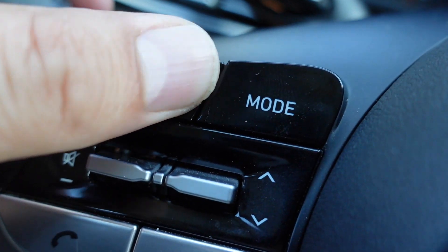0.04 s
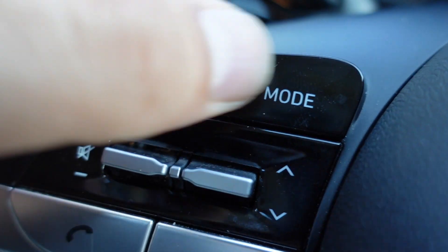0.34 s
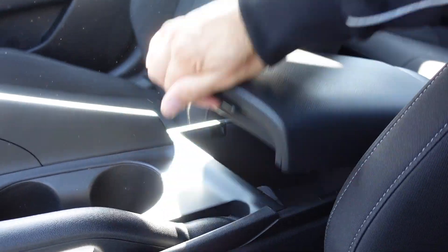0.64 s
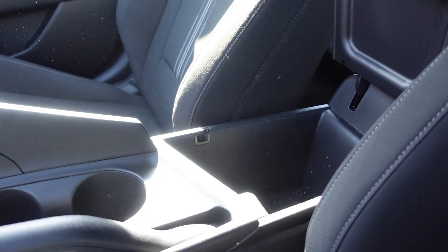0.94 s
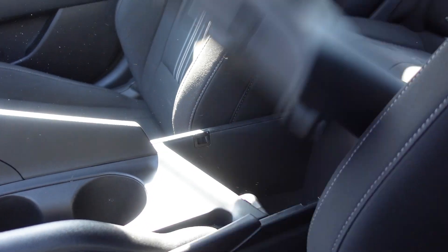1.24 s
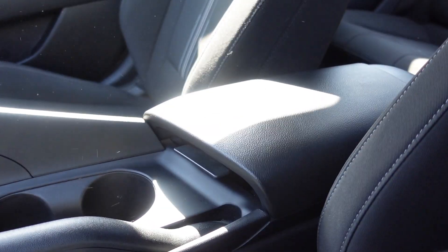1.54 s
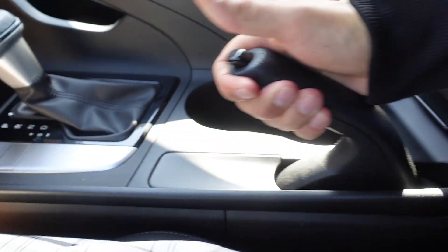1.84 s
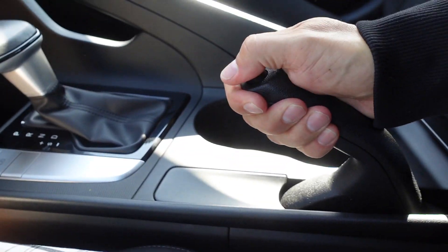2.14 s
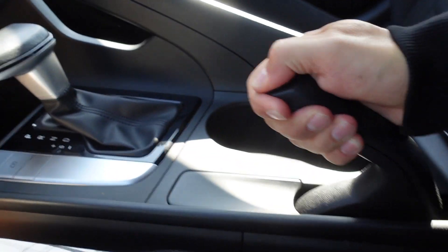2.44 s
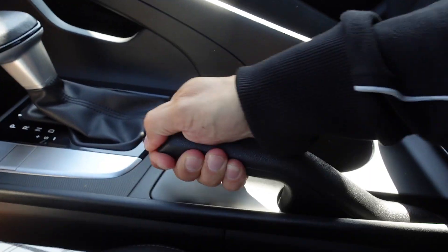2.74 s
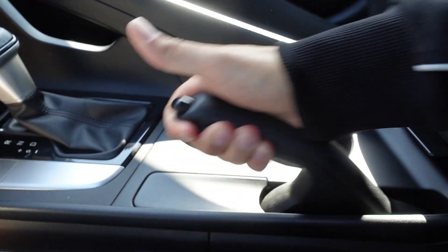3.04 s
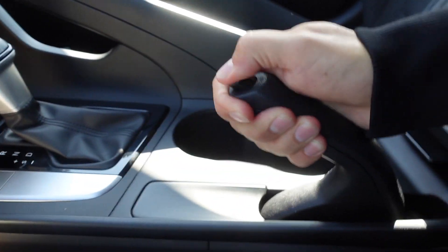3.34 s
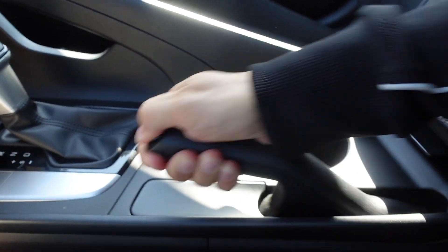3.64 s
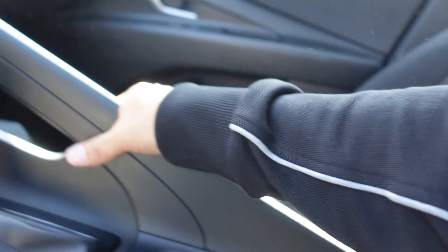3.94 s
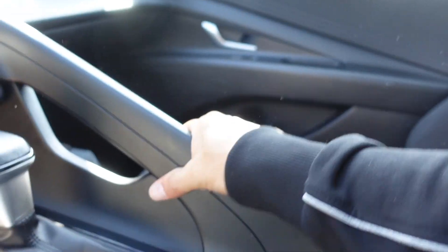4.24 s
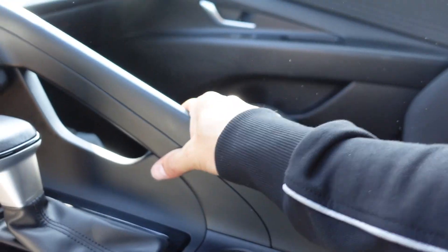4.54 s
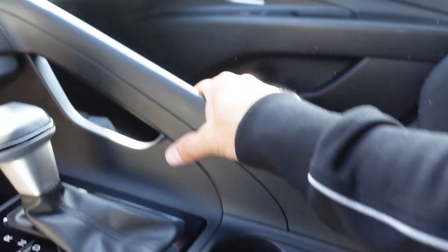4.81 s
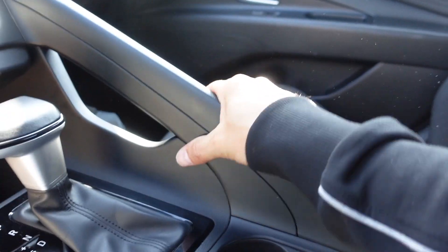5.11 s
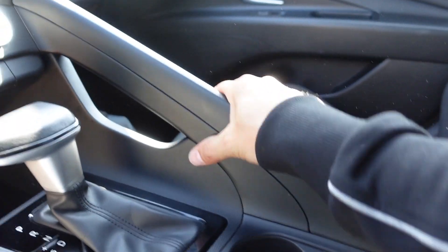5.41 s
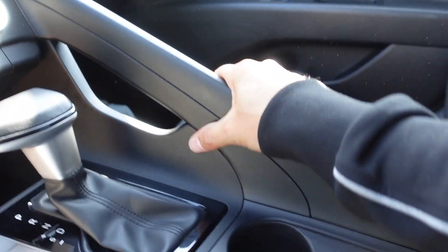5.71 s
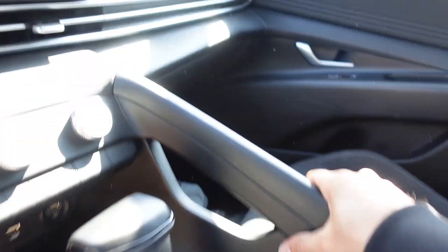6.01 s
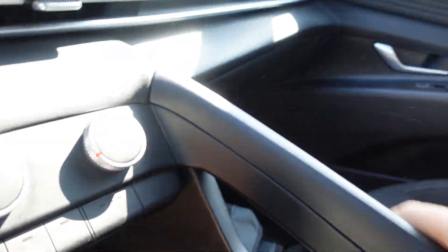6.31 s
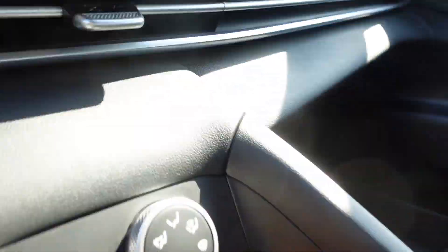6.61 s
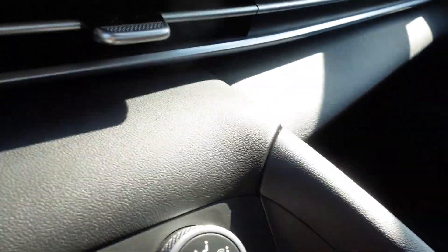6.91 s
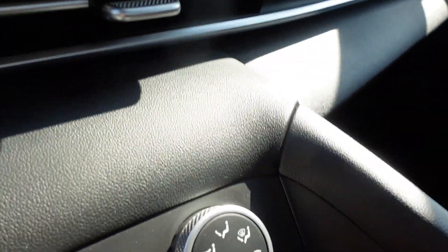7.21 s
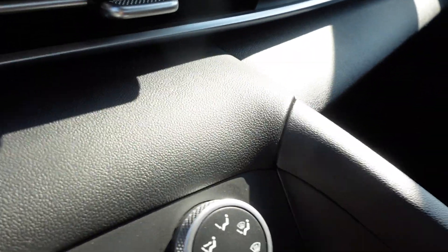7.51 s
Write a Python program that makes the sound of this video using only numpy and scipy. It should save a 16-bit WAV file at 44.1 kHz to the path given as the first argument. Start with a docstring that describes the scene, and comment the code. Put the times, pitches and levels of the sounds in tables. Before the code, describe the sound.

Close clicks, a hollow lid slam and two handbrake pulls in a quiet car, then rhythmic creaking and snapping of rocked plastic trim.

```python
"""A plastic grab rail creaks and snaps as a hand rocks it, close up in a parked car.
Each stroke ticks loose, squeals by stick-slip and ends in snaps of the rail's joints.
Before that, a steering wheel button clicks, the armrest lid opens and slams on its hollow box,
and the handbrake is twice pulled over its steel ratchet and let down again.
Faint cabin rumble, hiss and the rub of a sleeve lie underneath."""
import sys
import numpy as np
from scipy import signal
from scipy.fft import rfft, irfft, next_fast_len
from scipy.io import wavfile
from scipy.ndimage import map_coordinates

SR = 44100
rng = np.random.default_rng(int(sys.argv[2]) if len(sys.argv) > 2 else 0)


def inscribe(sig):
    """Save sig as 16-bit PCM at rate SR to the path in sys.argv[1].

    A 1-D sig is mono; a 2-D sig holds one channel per row.
    Samples are clipped to [-1, 1] before scaling.
    """
    pcm = np.round(np.clip(np.atleast_2d(sig).T, -1, 1) * 32767)
    wavfile.write(sys.argv[1], SR, pcm.astype(np.int16))


N = 333396
RING_TIME_S = np.arange(SR // 6) / SR

# Spectra of the lever's plastic and of the rail. Each row: frequency in Hz, relative density in dB.
PLASTIC_SPECTRUM = [(210, -29), (350, -7.5), (557, -6), (685, -16), (871, -13.5), (1020, -4), (1380, -5),
                    (1790, -2.5), (2240, -1.5), (3030, -2), (3560, 0), (4750, 1.5), (7550, -5),
                    (12200, -24.5), (16000, -42)]
RAIL_SPECTRUM = [(88, -50), (150, -28), (250, -15), (350, -23), (514, -7.5), (745, -12), (950, 1),
                 (1140, 2), (1790, -1), (2180, -1.5), (2980, -4.5), (4860, -10), (7620, -17),
                 (14500, -34.5), (16000, -45)]
# Rail resonances. Each row: centre in Hz, width in Hz, strength in dB.
RAIL_RESONANCES = [(529, 100, 3), (1140, 63, -7.5), (1550, 81, -3), (1904, 32, -1.5), (2274, 20, -2)]
# Rail decay. Each row: frequency in Hz, T60 in seconds.
RAIL_T60 = [(300, 0.18), (515, 0.17), (750, .055), (1200, 0.073), (3000, 0.083), (7000, 0.084),
            (14000, 0.097)]


def amp(db):
    """Decibels to gain."""
    return 10 ** (np.asarray(db) / 20)


def unit(x):
    """Scale to rms 1."""
    return x / np.sqrt(np.mean(x ** 2) + 1e-20)


def along(points, hz):
    """Interpolate (Hz, value) points on a log frequency axis."""
    f, v = np.transpose(points)
    return np.interp(np.log(hz + 1), np.log(f + 1), v)


def curve(rows):
    """One value per sample from (seconds, value) rows."""
    return np.interp(np.arange(N) / SR, *np.transpose(rows))


def wobble(knots_per_s, size):
    """Smooth random curve."""
    knots = rng.standard_normal(int(size * knots_per_s / SR) + 4)
    return map_coordinates(knots, [np.arange(size) * knots_per_s / SR])


def add(track, start_s, sound):
    """Mix a sound into the track."""
    room = track[:, max(round(start_s * SR), 0):]
    room[:, :sound.shape[-1]] += sound[..., :room.shape[1]]


def noise(spectrum, size, tilt_db_oct=0, peaks=()):
    """Stereo noise of rms 1, shaped by a spectrum, a tilt and resonances."""
    # Stereo image. Each row: frequency in Hz, then left-right coherence or left minus right in dB.
    coherence = [(150, .999), (500, 0.92), (2000, 0.84), (5000, 0.86), (9000, 0.7), (15000, .8)]
    balance = [(100, 0), (500, -1), (1500, -0.5), (4500, -1.2), (9000, 0), (14000, 1.5)]
    padded = next_fast_len(size)
    hz = np.fft.rfftfreq(padded, 1 / SR)
    octaves = np.log2(np.clip(hz, 700, 9000) / 2500)
    resonance = 1 + sum(amp(db) / (1 + (2 * (hz - centre) / width) ** 2) for centre, width, db in peaks)
    gain = amp(along(spectrum, hz) + tilt_db_oct * octaves) * resonance
    spread_rad = np.arccos(np.clip(along(coherence, hz), -1, 1)) / 2
    mid, side = rfft(rng.standard_normal((2, padded))) * gain * [np.cos(spread_rad), np.sin(spread_rad)]
    lean_db = along(balance, hz) / 2
    channels = np.array([mid + side, mid - side]) * amp([lean_db, -lean_db])
    return unit(irfft(channels, padded)[:, :size])


def click(spectrum, decay, tilt_db_oct, crack, peaks=()):
    """A contact: a direct crack, then dense modes and close reflections dying band by band."""
    size = len(RING_TIME_S)
    hz, t, bands = signal.stft(noise(spectrum, size, tilt_db_oct, peaks), SR, nperseg=256)
    fade = amp(-60 * t / along(decay, hz)[:, None])
    tail = signal.istft(bands * fade, SR, nperseg=256)[1][:, :size]
    sound = tail * (1 + crack * np.exp(-RING_TIME_S / 0.00058))
    # small parts radiate little bass, and no contact is perfectly hard
    sound = signal.sosfilt(signal.butter(2, [170, 13500], 'bandpass', fs=SR, output='sos'), sound)
    return sound / sound[:, :SR // 125].std()


def thump(modes, rise_s):
    """The console's low modes swell after a blow and ring out, at new strengths each time."""
    t = np.arange(SR // 2) / SR
    hz, db, t60_s = np.transpose(modes)[:, :, None]
    detune, phase, strength = rng.standard_normal((3, len(modes), 1))
    swing = np.sin(2 * np.pi * (hz * (1 + 0.036 * detune) * t + phase))
    fade = amp(db + 1.23 * strength - 60 * t / t60_s)
    sound = (fade * swing).sum(0) * (1 - np.exp(-(t / rise_s) ** 2))
    return sound / sound[:SR // 40].std()


def cabin_reverb(x, wet_db, t60_s):
    """The upholstered cabin adds a weak, short tail."""
    envelope = amp(-60 * RING_TIME_S / t60_s) * (1 - np.exp(-RING_TIME_S / 0.0013))
    tail = rng.standard_normal((2, len(envelope))) * envelope
    return x + amp(wet_db) * signal.fftconvolve(x, tail / np.linalg.norm(tail[0]), axes=1)[:, :N]


def cabin_air():
    """Faint wavering rumble and steady hiss."""
    # Each row: time in seconds, level in dB.
    rumble_levels = [(0.0, -56), (1.26, -55), (1.45, -42), (1.6, -47), (2.0, -46), (2.21, -57), (2.5, -57),
                     (2.65, -44), (2.97, -43), (3.51, -48), (3.73, -45), (3.96, -55), (4.17, -55),
                     (4.36, -48), (5.94, -47), (6.53, -51), (7.56, -52)]
    # Each row: frequency in Hz, relative density in dB.
    rumble_spectrum = [(15, -51.5), (25, -31), (75, 4.5), (361, 1), (383, -21), (465, -2.5), (494, -25),
                       (628, -4), (900, -48), (1170, -64), (1980, -120)]
    hiss_spectrum = [(410, -38), (700, 2.5), (1360, 1), (4000, -8.5), (8760, -11), (12000, -18),
                     (16000, -14.5)]
    rumble = amp(curve(rumble_levels) + 1.5 * wobble(9, N)) * noise(rumble_spectrum, N)
    return rumble + amp(-60) * noise(hiss_spectrum, N)


def sleeve():
    """Grainy friction of cloth and hand: separate rubs on the trim, then a steady rub on the rail."""
    # Each row: start in seconds, end in seconds, relative level in dB.
    rubs = [(.43, .7, -53), (.74, 1.15, -45), (1.22, 1.47, -36.5), (1.86, 2.13, -41), (2.44, 2.62, -42),
            (2.56, 2.9, -41), (2.97, 3.2, -47), (3.58, 3.72, -51), (3.83, 4.06, -45.5), (6.38, 6.54, -32.5)]
    # Each row: frequency in Hz, relative density in dB.
    cloth_spectrum = [(150, -19), (300, 3.5), (560, 15), (750, 3), (950, 1.5), (1560, 3.5), (3700, -0.5),
                      (9550, -13), (14200, -24.5), (16000, -40)]
    stir_s, stir_db, grip_s, grip_db = .42, -63, 4.12, -46.5
    rise_s, fade_db = .05, 12
    t = np.arange(N) / SR
    friction = amp(stir_db) * (t > stir_s) + amp(grip_db) * np.clip((t - grip_s) / rise_s, 0, 1)
    for start_s, end_s, db in rubs:
        edges = np.clip(np.minimum(t - start_s, end_s - t) / rise_s, 0, 1)
        progress = np.clip((t - start_s - rise_s) / (end_s - start_s), 0, 1)
        friction += edges * amp(db - fade_db * progress)
    grain = unit(amp(1.5 * wobble(30, N) + 2 * wobble(400, N)))
    low_cut = signal.butter(1, 800, 'highpass', fs=SR, output='sos')  # light cloth radiates little bass
    return friction * grain * signal.sosfilt(low_cut, noise(cloth_spectrum, N))


def scuffs():
    """Plastic parts and fingers brush past each other in short soft swishes."""
    # Each row: start in seconds, end in seconds, level in dB, tilt in dB/octave.
    swishes = [(0.515, 0.551, -32.5, -6), (0.773, 0.8, -40, -11), (1.27, 1.299, -29, 2.5),
               (1.714, 1.752, -37, 1.5), (2.467, 2.481, -28.5, -6), (3.034, 3.058, -30, 2),
               (3.063, 3.1, -39, -5.5), (3.432, 3.448, -35, 2), (3.979, 4, -29.5, -7.5)]
    out = np.zeros((2, N))
    for start_s, end_s, db, tilt in swishes:
        size = max(round((end_s - start_s) * SR), SR // 200)
        add(out, start_s, amp(db) * np.hanning(size) * noise(PLASTIC_SPECTRUM, size, tilt))
    return out


def wheel_button():
    """A small plastic switch goes down and springs back."""
    # Each row: start in seconds, relative level in dB, tilt in dB/octave.
    contacts = [(0.2148, -41.5, -11), (0.348, -27, -1), (0.3745, -41.5, -3.5)]
    # Each row: frequency in Hz, relative density in dB.
    spectrum = [(300, -62), (600, -40), (780, -2.5), (1150, -3), (1700, -7), (2100, -10), (3400, -3.5),
                (4300, -10), (5900, -12), (6800, -6), (9000, -25), (15000, -43)]
    # Each row: centre in Hz, width in Hz, strength in dB.
    peaks = [(1230, 99, 0.5), (1640, 220, -2), (3500, 250, -4)]
    decay = [(700, 0.045), (4000, 0.039)]  # Each row: frequency in Hz, T60 in seconds.
    out = np.zeros((2, N))
    for start_s, db, tilt in contacts:
        add(out, start_s, amp(db + 2.5) * click(spectrum, decay, tilt, crack=0.46, peaks=peaks))
    return out


def lid_slam(start_s, db, tilt_db_oct, count):
    """Contact rows of the lid hitting its latch; each rebound is later, weaker and duller."""
    first_gap_s, gap_growth, loss_db, dulling_db_oct = .006, 1.23, 1.1, 1.3
    bounce = np.arange(count)
    gaps_s = first_gap_s * gap_growth ** bounce
    times_s = start_s + np.cumsum(gaps_s) - gaps_s
    return list(zip(times_s, db - loss_db * bounce, tilt_db_oct - dulling_db_oct * bounce))


def armrest():
    """The latch lets go, the hinge knocks, and the lid slams and rattles on its hollow box."""
    # Each row: start in seconds, level in dB, tilt in dB/octave.
    opening_clicks = [(0.4425, -35.5, 0), (0.5332, -15, .5), (0.537, -31, .6), (0.6713, -37.5, -11),
                      (.696, -41.5, -10), (0.806, -28, -5), (0.8107, -27, -4)]
    lid_touches = [(1.2434, -39, -2), (1.3269, -27, -3.5)]
    box_thuds = [(0.445, -43.5, -1), (.535, -34, 4), (0.809, -45, 4), (1.26, -40, 0), (1.339, -18.5, 5),
                 (1.378, -17.5, 2), (1.4, -22, -1)]
    # Each row: frequency in Hz, relative density in dB.
    latch_spectrum = [(200, -39), (400, -6.5), (520, -17), (620, -17), (780, -13.5), (1080, -8), (1350, -8),
                      (1650, -11.5), (2200, -0.5), (3400, -9), (4400, -4.5), (6000, -17), (10000, -29),
                      (16000, -66)]
    lid_spectrum = [(160, -48), (280, -20.5), (524, -6.5), (698, -20.5), (1050, -2.5), (1280, -4.5),
                    (1450, -3), (2130, -3), (2530, -1.5), (3310, -12.5), (3670, -4), (5890, -15.5),
                    (6640, -8), (10700, -26.5), (16000, -58)]
    # Each row: centre in Hz, width in Hz, strength in dB.
    latch_peaks = [(410, 42, 2), (1110, 73, -2), (2060, 220, 2.5), (2500, 72, 6)]
    lid_peaks = [(390, 60, 0), (540, 43, -4.5), (1080, 60, -8)]
    # Each row: frequency in Hz, T60 in seconds.
    latch_decay = [(400, 0.11), (1200, 0.066), (2500, 0.054), (7000, .045)]
    lid_decay = [(300, 0.094), (1200, 0.048), (3000, 0.073), (7000, 0.057), (14000, 0.088)]
    # Each row: frequency in Hz, relative level in dB, T60 in seconds.
    box_modes = [(50, -6, .2), (72, -17, 0.24), (120, -14.5, 0.39), (131, -25.5, 0.74), (142, 2.5, 0.062),
                 (177.5, -9, 0.11), (250, -2.5, 0.084), (332, -13.5, 0.03), (410, -3.5, 0.057),
                 (500, -9.5, 0.1)]
    out = np.zeros((2, N))
    for start_s, db, tilt in opening_clicks:
        latch = click(latch_spectrum, latch_decay, tilt, crack=0.3, peaks=latch_peaks)
        add(out, start_s, amp(db) * latch)
    for start_s, db, tilt in lid_touches + lid_slam(start_s=1.3376, db=-14, tilt_db_oct=1.2, count=7):
        add(out, start_s, amp(db) * click(lid_spectrum, lid_decay, tilt, crack=0.14, peaks=lid_peaks))
    for start_s, db, tilt in box_thuds:
        # each thud has its own tilt, duller or brighter
        modes = [(hz, mode_db + tilt * np.log2(hz), t60_s) for hz, mode_db, t60_s in box_modes]
        add(out, start_s, amp(db) * thump(modes, rise_s=0.0045))
    return out


def latch_spring():
    """The slam leaves the latch's small spring faintly ringing."""
    start_s, hz, db, t60_s = 1.34, 4050, -51, .6
    out = np.zeros((2, N))
    t = np.arange(SR // 2) / SR
    add(out, start_s, amp(db - 60 * t / t60_s) * np.sin(2 * np.pi * hz * t))
    return out


def sector_ring():
    """The ratchet's toothed steel sector rings on, at new strengths for each tooth."""
    # Each row: frequency in Hz, relative level in dB, T60 in seconds.
    modes = [(2439, 0, .085), (3024, -1.5, .075), (4135, -2.5, .075), (4524, -2, .075), (5020, -6, .06),
             (5600, -8, .06)]
    hz, db, t60_s = np.transpose(modes)[:, :, None]
    strength, phase = rng.standard_normal((2, len(modes), 1))
    fade = amp(db + 2 * strength - 60 * RING_TIME_S / t60_s)
    return (fade * np.sin(2 * np.pi * (hz * RING_TIME_S + phase))).sum(0)


def handbrake():
    """The pawl drops over seven teeth a pull; the button clacks and the lever lands on its stops."""
    # Each row: start in seconds, relative level in dB.
    teeth = [(1.7544, -12.5), (1.793, -11.5), (1.8114, -11.5), (1.8284, -10), (1.849, -11), (1.8749, -9),
             (1.9211, -10), (3.0898, -11), (3.1025, -13.5), (3.113, -12), (3.1255, -12), (3.138, -13.5),
             (3.1532, -12), (3.1762, -10.5)]
    # Each row: start in seconds, relative click level in dB, tilt in dB/octave, relative thump in dB.
    lever_knocks = [(2.026, -41, -6, -39), (2.0938, -24.5, 1.7, -40), (2.446, -39.5, 5, -54),
                    (2.4762, -15, 1.2, -20.5), (2.5369, -35.5, -1, -36.5), (2.7306, -30, 2, -44),
                    (2.7587, -21, -8, -18.5), (2.8408, -34, 6, -47), (2.8614, -12, -.9, -30),
                    (2.9741, -28, -8.5, -30), (3.3152, -35.5, -1.5, -38), (3.4439, -16, 1.5, -19.5),
                    (3.7055, -32, 2.5, -43), (3.7325, -23.5, -8, -17.5), (3.821, -14.5, -1.5, -30),
                    (3.865, -18, 2.5, -33.5)]
    # Each row: frequency in Hz, relative density in dB.
    pawl_spectrum = [(210, -46), (350, -23), (506, -18.5), (685, -27), (766, -17.5), (1060, -24.5),
                     (1200, -14.5), (1600, -9), (2270, -12), (2390, -8), (3790, -3), (4110, -0.5),
                     (9590, -14), (11800, -15.5), (16000, -30)]
    # Each row: centre in Hz, width in Hz, strength in dB.
    pawl_peaks = [(1900, 50, -16), (2510, 20, 9), (2480, 66, 5), (3090, 30, 13), (4410, 38, 6),
                  (4860, 63, -2), (4650, 64, 0), (5660, 90, 5)]
    lever_peaks = [(1004, 110, -10), (1280, 100, -8), (1760, 84, -15), (3040, 400, 3.5)]
    # Each row: frequency in Hz, T60 in seconds.
    decay = [(300, 0.11), (1200, 0.11), (3000, 0.063), (7000, 0.062), (14000, 0.072)]
    # Each row: frequency in Hz, relative level in dB, T60 in seconds.
    lever_modes = [(95, -11.5, 0.12), (133.3, -0.5, 0.18), (151.5, 3, 0.13), (191.5, 12, 0.061),
                   (255.5, -1, 0.16), (298, -9, 0.18), (435.4, -9.5, 0.092)]
    out = np.zeros((2, N))
    # all teeth strike the same sector; each adds a click of its own
    sector = click(pawl_spectrum, decay, tilt_db_oct=0, crack=.6, peaks=pawl_peaks)
    for start_s, db in teeth:
        tooth = click(pawl_spectrum, decay, tilt_db_oct=-.5, crack=0.37, peaks=pawl_peaks)
        add(out, start_s, amp(db - 3.6) * (sector + tooth) + amp(db - 11) * sector_ring())
        add(out, start_s, amp(db - 17) * thump(lever_modes, rise_s=0.0073))
    for start_s, db, tilt, thump_db in lever_knocks:
        clack = click(PLASTIC_SPECTRUM, decay, tilt, crack=.5, peaks=lever_peaks)
        add(out, start_s, amp(db - 0.04) * clack)
        add(out, start_s, amp(thump_db + 1.75) * thump(lever_modes, rise_s=0.0076))
    return out


def swell(length_s):
    """Pressure builds and lets go."""
    return np.abs(np.hanning(max(round(length_s * SR), SR // 100))) ** .6


def snap(db, tilt_db_oct, crack=.7):
    """One joint of the rail jumps."""
    return amp(db) * click(RAIL_SPECTRUM, RAIL_T60, tilt_db_oct, crack, peaks=RAIL_RESONANCES)


def crackle(pressure, slips_per_s=1800):
    """Tiny irregular slips, each ringing the rail."""
    size = len(pressure)
    ring = snap(db=0, tilt_db_oct=1.5, crack=0.92)
    grains = unit(rng.standard_normal(size) * (rng.random(size) < slips_per_s / SR))
    return signal.fftconvolve((pressure * grains)[None], ring / np.linalg.norm(ring[0]), axes=1)


def squeal(size, first_hz, last_hz):
    """Stick-slip pulses, unsteady in rate and level; the pitch bends as the stroke runs out."""
    slip_hz = first_hz + (last_hz - first_hz) * np.linspace(0, 1, size) ** 1.5
    jitter = .035 * wobble(160, size) + .033 * wobble(700, size) + .05 * wobble(3000, size)
    phase = 2 * np.pi * np.cumsum(slip_hz * np.exp(jitter)) / SR
    harmonic = np.arange(1, 9)[:, None]
    radiation = amp(along(RAIL_SPECTRUM, harmonic * slip_hz))
    pulses = unit((radiation * harmonic ** -.2 * np.sin(harmonic * phase)).sum(0))
    return pulses * amp(2.5 * wobble(250, size))


def strokes(rows, slide_s, bend_ratio, squeal_gain, crackle_gain):
    """Each stroke ticks loose, slides with a squeal and ends in a run of snaps, scraping throughout."""
    rasp_lead_s, rasp_s, snap_gap_s = .004, .022, .016
    scrape_db, overrun_s = -30.5, .03
    firm_tick_db, firm_slide_db = -23, -17
    out = np.zeros((2, N))
    for start_s, tick_db, slide_db, hz, first_s, last_s, first_db, last_db, tilt in rows:
        add(out, start_s, snap(tick_db, tilt_db_oct=3.2, crack=.15))
        add(out, start_s - rasp_lead_s, crackle(amp(tick_db - 7) * swell(rasp_s)))
        # softer ticks give way sooner; gentler slides bend less
        slip_s = start_s + .02 * np.sqrt(amp(tick_db - firm_tick_db))
        last_hz = hz * bend_ratio ** min(np.sqrt(amp(slide_db - firm_slide_db)), 1)
        pressure = amp(slide_db) * swell(slide_s)
        add(out, slip_s, squeal_gain * pressure * squeal(len(pressure), hz, last_hz))
        add(out, slip_s, crackle_gain * crackle(pressure))
        scrape_pressure = amp(scrape_db) * swell(last_s - start_s + overrun_s)
        add(out, start_s, crackle(scrape_pressure, slips_per_s=550))
        count = max(round((last_s - first_s) / snap_gap_s), 1) + 1
        for snap_s, snap_db in np.linspace((first_s, first_db), (last_s, last_db), count):
            add(out, snap_s, snap(snap_db, tilt))
    return out


def grab_rail():
    """The rail rocks about three times a second: long slowing pushes, short raspy releases."""
    # Each row: start in seconds, tick in dB, relative slide level in dB, opening squeal pitch in Hz,
    # first and last snap in seconds, first and last snap in dB, snap tilt in dB/octave.
    pushes = [(4.3176, -26, -16, 2900, 4.3485, 4.3786, -13.3, -14.5, .5),
              (4.6458, -22, -17.5, 3155, 4.678, 4.7041, -16, -13, -1.2),
              (4.9416, -22, -18.5, 2946, 4.9852, 5.0269, -14.5, -13, -.8),
              (5.2577, -24, -15.5, 3037, 5.3005, 5.334, -14, -16.5, 0),
              (5.5709, -24, -18, 3780, 5.6323, 5.642, -14, -21, -1),
              (5.8692, -23, -17, 2450, 5.931, 5.94, -11.5, -23, -1.7),
              (6.1868, -20, -17.5, 2560, 6.2462, 6.255, -11.5, -20, -.9),
              (6.5227, -22, -37, 2400, 6.5406, 6.5765, -16.5, -17.5, 1),
              (6.6955, -27, -24, 2510, 6.7635, 6.772, -14.5, -18, 4),
              (7.0212, -24, -24.5, 2745, 7.0619, 7.094, -14, -16.5, -.2),
              (7.3761, -24, -22, 2544, 7.4332, 7.4551, -18.5, -13.5, .9)]
    releases = [(4.122, -40, -20, 2700, 4.1722, 4.2075, -17.5, -17.5, 2),
                (4.4669, -32, -16.5, 2100, 4.5327, 4.559, -19, -23, .4),
                (4.7778, -32, -15.5, 2200, 4.8436, 4.8669, -18.5, -20.5, 1.7),
                (5.088, -35, -17, 2276, 5.1587, 5.1737, -16.8, -19.5, .6),
                (5.389, -35, -17, 2180, 5.4536, 5.4765, -17.5, -19, .5),
                (5.694, -35, -15.5, 2750, 5.7567, 5.7772, -17, -20.5, .2),
                (5.9903, -24, -31, 2400, 6.0512, 6.08, -19.5, -18.5, -.2),
                (6.3088, -21, -22, 2650, 6.332, 6.341, -28, -27, 2.5),
                (6.8374, -28, -33, 2400, 6.8901, 6.9169, -24, -19.5, -1.3),
                (7.18, -40, -25, 2230, 7.2245, 7.2656, -21, -17, -.3)]
    # Single snaps and ticks of the rail's joints, during and between strokes.
    # Each row: start in seconds, level in dB, tilt in dB/octave.
    single_snaps = [(4.1397, -16.5, 4.8), (4.2619, -27, -.5), (5.2009, -29.5, 3.8), (5.4898, -24.5, 6.8),
                    (6.7296, -18.5, 0), (6.9446, -14, 1.3), (7.1566, -29, 4), (7.3039, -27, 8),
                    (7.5065, -30.5, 5.4), (7.5452, -31.5, 5)]
    out = strokes(pushes, slide_s=.079, bend_ratio=.32, squeal_gain=.82, crackle_gain=.39)
    out += strokes(releases, slide_s=.02, bend_ratio=1.1, squeal_gain=.72, crackle_gain=.6)
    for start_s, db, tilt in single_snaps:
        add(out, start_s, snap(db, tilt))
    pan_db = curve([(4.1, 0), (5.8, -0.5), (6.3, -1.7), (7.5, -2)])  # drifts slightly right
    return out * amp([pan_db / 2, -pan_db / 2])


def scene():
    """Controls and rail in the cabin, over rumble, hiss and cloth."""
    controls = wheel_button() + armrest() + latch_spring() + handbrake() + scuffs()
    parts = controls * amp([[-.1], [.1]]) + grab_rail()
    return cabin_reverb(parts, wet_db=-26.5, t60_s=0.38) + cabin_air() + sleeve()


def record(dry):
    """Round off the highest peaks; cut the deepest bass and the top treble."""
    ceiling, low_hz, top_hz = .95, 45, 16000
    rounded = dry / (1 + np.abs(dry / ceiling) ** 6) ** (1 / 6)
    low_cut = signal.sosfilt(signal.butter(3, low_hz, 'highpass', fs=SR, output='sos'), rounded)
    size = next_fast_len(N + SR // 4)
    passband = np.fft.rfftfreq(size, 1 / SR) < top_hz
    return irfft(rfft(low_cut, size) * passband, size)[:, :N]


dry = scene()
out = record(dry)
inscribe(out)
```